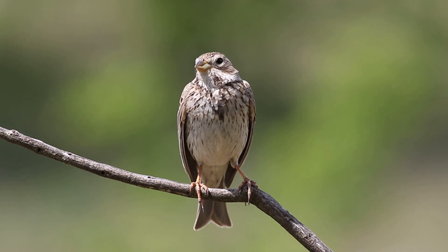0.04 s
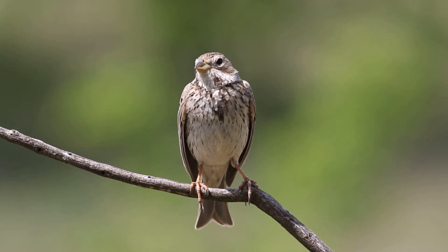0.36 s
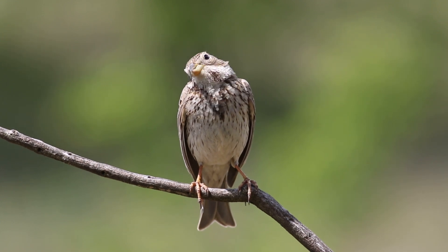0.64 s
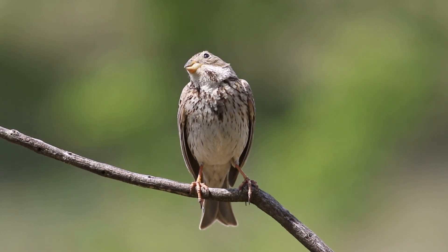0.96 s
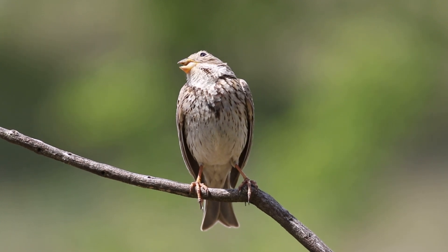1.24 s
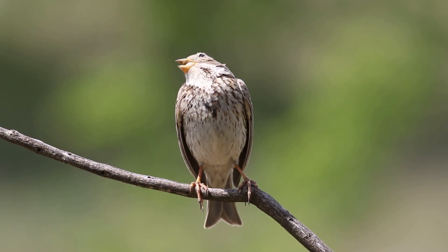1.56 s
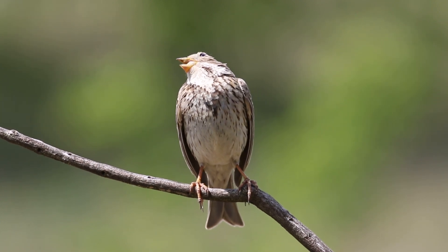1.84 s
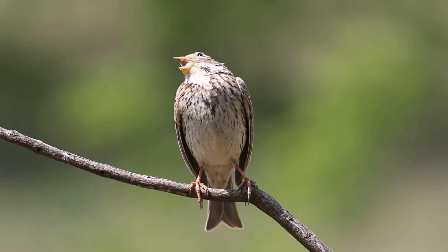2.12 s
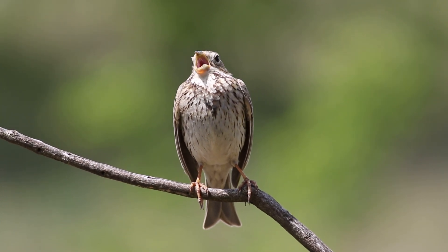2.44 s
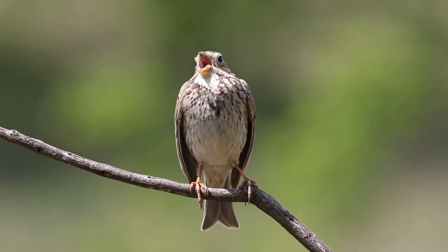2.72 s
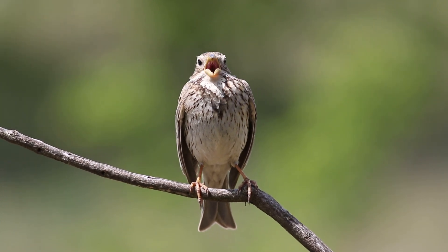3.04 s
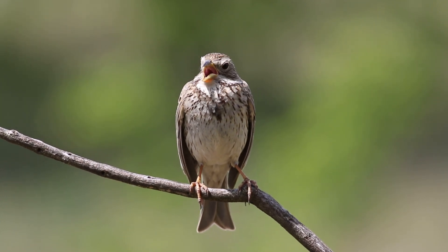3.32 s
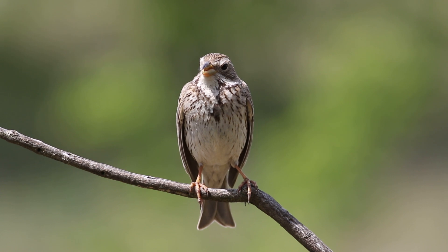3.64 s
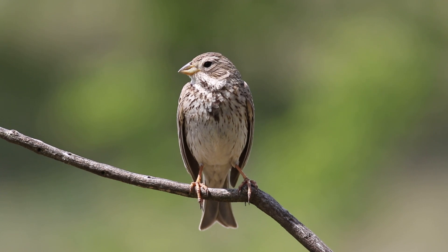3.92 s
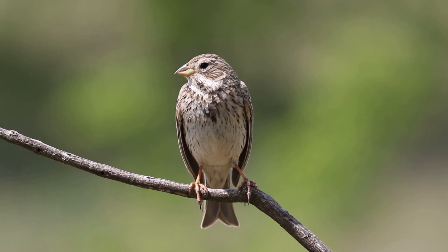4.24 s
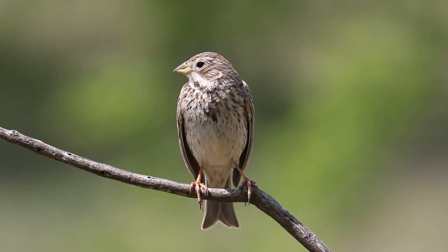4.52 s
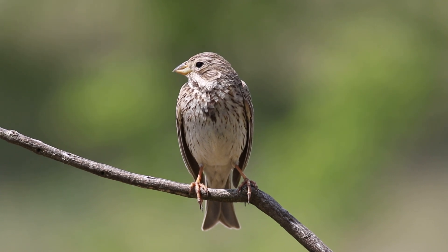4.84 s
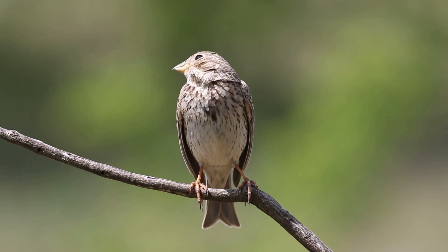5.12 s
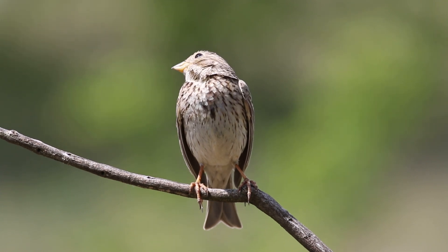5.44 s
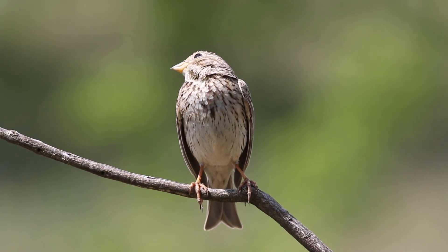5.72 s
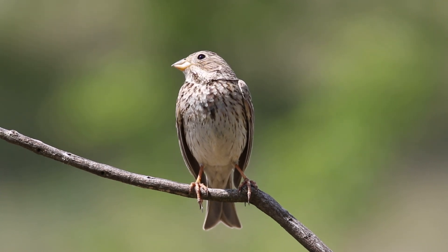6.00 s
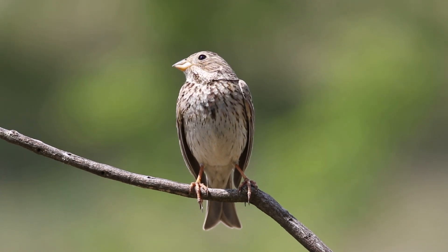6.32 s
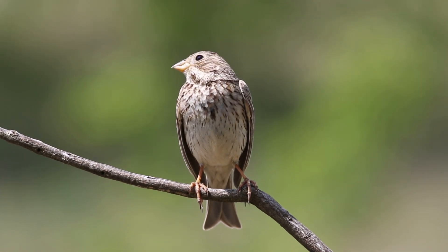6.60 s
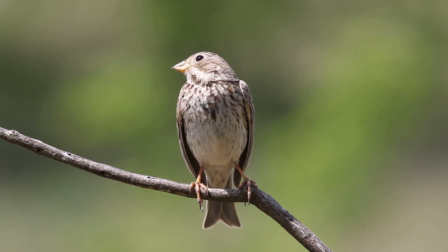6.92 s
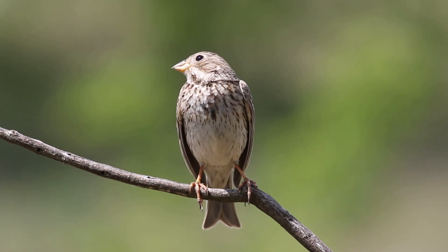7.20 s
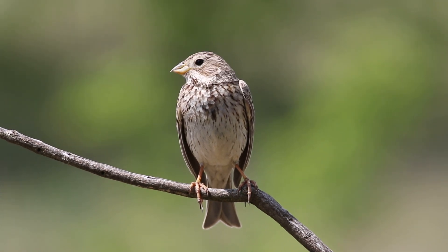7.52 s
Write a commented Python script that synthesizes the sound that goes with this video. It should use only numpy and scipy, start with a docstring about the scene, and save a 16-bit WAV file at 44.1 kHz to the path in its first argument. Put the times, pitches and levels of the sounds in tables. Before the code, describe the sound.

A small bird sings close by, sharp ticks speeding into a bright jangle and falling chips, with faint distant whistles.

```python
"""Open scrub. A bunting sings: sharp ticks speed up into a jangle, then falling chips and two soft
afternotes. Each note is a whistle some milliseconds long; the two sides of the syrinx often sound
together, and the foliage scatters them. A far bird whistles low phrases over a faint wash of air,
with a few distant calls, dry ticks and leaf rustles."""
import sys
import numpy as np
from scipy import signal
from scipy.fft import rfft, irfft
from scipy.io import wavfile
from scipy.ndimage import uniform_filter1d

SR = 44100
rng = np.random.default_rng(int(sys.argv[2]) if len(sys.argv) > 2 else 0)


def to_wav(s):
    """Save 16-bit WAV."""
    ch = np.atleast_2d(s).T  # columns
    pcm = np.round(np.clip(ch, -1, 1) * 32767)  # PCM
    wavfile.write(sys.argv[1], SR, pcm.astype(np.int16))


N = 337806
TIME = np.arange(N) / SR


def from_db(db):
    """dB to gain."""
    return 10 ** (np.asarray(db) / 20)


def unit_rms(x):
    """Scale to unit power."""
    return x / np.sqrt(np.mean(x ** 2) + 1e-20)


def in_time(rows):
    """Interpolate each column after t/s to every sample."""
    times_s, *columns = np.transpose(rows)
    return [np.interp(TIME, times_s, column) for column in columns]


def coloured(x, spectrum):
    """Filter by rows of f/Hz, gain/dB."""
    hz, db = np.transpose(spectrum)
    bins_hz = np.maximum(np.fft.rfftfreq(N, 1 / SR), 1)
    return irfft(rfft(x) * from_db(np.interp(np.log(bins_hz), np.log(hz), db)), N)


def noise(spectrum):
    """Coloured noise, unit RMS."""
    return unit_rms(coloured(rng.standard_normal(N), spectrum))


def drift(corner_hz):
    """Low-passed random wander, unit RMS."""
    bins_hz = np.fft.rfftfreq(N, 1 / SR)
    return unit_rms(irfft(rfft(rng.standard_normal(N)) / (1 + (bins_hz / corner_hz) ** 2), N))


def air(wash_gain_db, hiss_gain_db, sway_db, stir_db):
    """Steady distant wash under a thin, slightly stirring hiss."""
    # air levels: t/s, wash/dB, hiss/dB
    levels = [(0.0, -58.5, -64.5), (4.29, -57.5, -64), (4.95, -57, -61), (7.66, -56.5, -61)]
    # wash spectrum: f/Hz, density/dB
    wash_colour = [(15, -56.5), (25, -33), (54, -8.5), (189, -1.5), (326, -4.5), (520, -1), (593, -4),
                   (676, -2.5), (1930, -8.5), (2200, -13.5), (2860, -32.5), (4840, -120)]
    # hiss spectrum: f/Hz, density/dB
    hiss_colour = [(1300, -19.5), (2000, -2), (3700, 0.5), (4600, -5), (7000, -6.5), (10000, -9),
                   (14200, -15), (14700, -52.5)]
    wash_db, hiss_db = in_time(levels)
    wash = from_db(wash_db + wash_gain_db + sway_db * drift(5)) * noise(wash_colour)
    hiss = from_db(hiss_db + hiss_gain_db + stir_db * drift(25)) * noise(hiss_colour)
    return wash + hiss


def leaves(decay_s, crackle_db):
    """Dry snaps die at once; rustles are grainy swells."""
    # ticks in the undergrowth: t/s, level/dB
    dry_ticks = [(0.6577, -45), (4.396, -46.5), (5.066, -45.5), (5.0941, -37.5), (5.2553, -45),
                 (6.6485, -44), (6.8267, -45.5), (6.868, -41)]
    # leaf rustles: t/s, half width/s, level/dB
    rustles = [(1.168, 0.02, -50.5), (3.812, 0.028, -54.5), (4.55, 0.013, -53.5), (4.91, .04, -57.5),
               (5.87, 0.034, -52), (7.25, 0.022, -56.5)]
    # leaf spectrum: f/Hz, density/dB
    leaf_colour = [(1500, -6.5), (3200, -2), (8000, -5.5), (14000, -13), (16000, -43.5)]
    snaps = sum(from_db(db) * (TIME >= s) * np.exp(-np.abs(TIME - s) / decay_s) for s, db in dry_ticks)
    swells = sum(from_db(db) / (1 + ((TIME - s) / half_s) ** 2) for s, half_s, db in rustles)
    grain = unit_rms(from_db(crackle_db * drift(123)))
    return (snaps + swells * grain) * noise(leaf_colour)


def foliage_scatter(x):
    """Countless small echoes off branch, ground and bushes, thinning with delay."""
    # echo decay: delay/s, level per ms/dB
    decay = [(.001, -11.5), (.006, -18.5), (.013, -22), (0.02, -27.5), (0.038, -36.5), (.07, -47),
             (.12, -63.5), (.3, -82.5)]
    # scattered share, less in the forward-beamed treble: f/Hz, gain/dB
    colour = [(1600, -7), (5300, 3), (7000, -2.5), (11000, -3)]
    delay_s, db = np.transpose(decay)
    lag_s = TIME[TIME < delay_s[-1]]
    envelope = from_db(np.interp(lag_s, delay_s, db)) * (lag_s > delay_s[0])
    echoes = rng.standard_normal(len(lag_s)) * envelope / np.sqrt(SR / 1000)
    return signal.fftconvolve(coloured(x, colour), echoes)[:N]


def faint_calls(jitter):
    """Short tones, blurred by distance."""
    # hoots and peeps: t/s, half length/s, f/Hz, level/dB
    calls = [(0.312, 0.026, 1700, -54), (2.07, 0.022, 1500, -53), (2.336, 0.043, 769, -60),
             (2.856, 0.051, 620, -59), (3.635, 0.092, 539, -55.5), (6.298, 0.0086, 1260, -43.5),
             (6.38, .05, 1944, -58.5), (7.367, 0.0073, 1884, -48.5)]
    wavering_s = np.cumsum(1 + jitter * drift(60.4)) / SR
    out = np.zeros(N)
    for s, half_s, hz, db in calls:
        envelope = np.exp(-np.minimum(((TIME - s) / half_s) ** 2, 20))
        out += from_db(db) * envelope * np.sin(2 * np.pi * hz * wavering_s)
    return out


def far_yelps(foot=.7, bend_s=.023, swell_s=.019, fall_stretch=1.2):
    """Pitch arches up and back down; yields samples, f/Hz, level/dB."""
    # arch tops: t/s, f/Hz, level/dB
    yelps = [(3.207, 1868, -41), (5.155, 1980, -34), (6.654, 1880, -37.5), (6.824, 1890, -37)]
    for s, top_hz, db in yelps:
        at = np.flatnonzero(np.abs(TIME - s) < 3 * swell_s)
        t = (TIME[at] - s) / np.where(TIME[at] > s, fall_stretch, 1)
        arch = foot + (1 - foot) * np.exp(-(t / bend_s) ** 2)
        yield at, top_hz * arch, db - 20 / np.log(10) * (t / swell_s) ** 2


def far_whistles(climb_share=.12, drop_share=.21, drop_s=.0285, fade_db=9.5):
    """Long notes climb and swell, then drop away; yields samples, f/Hz, level/dB."""
    # whistles: t/s, length/s, top f/Hz, level/dB, swell/dB
    whistles = [(3.243, .165, 1685, -43.5, 10), (5.199, 0.16, 1602, -38, 13), (6.029, .11, 1456, -44.5, 4),
                (6.685, .125, 1670, -42, 12.5)]
    for s, length_s, top_hz, db, swell_db in whistles:
        at = np.flatnonzero((TIME > s) & (TIME < s + length_s))
        t, climb_s = TIME[at] - s, length_s - drop_s
        to_climb = np.maximum(1 - t / climb_s, 0)
        drop = np.maximum((t - climb_s) / drop_s, 0) ** 2
        hz = top_hz * (1 - climb_share * to_climb ** 2 - drop_share * drop)
        yield at, hz, db - swell_db * to_climb - fade_db * drop


def far_bird(jitter, octave_db):
    """Soft, nearly pure yelps and whistles; one whistle is rolled."""
    roll_from_s, roll_to_s, roll_hz = 6.032, 6.123, 55
    out, waver = np.zeros(N), 1 + jitter * drift(92.4)
    for at, hz, db in [*far_yelps(), *far_whistles()]:
        phase = 2 * np.pi * np.cumsum(hz * waver[at]) / SR
        out[at] += from_db(db) * (np.sin(phase) + from_db(octave_db) * np.sin(2 * phase))
    rolling = (TIME > roll_from_s) & (TIME < roll_to_s)
    return out * (1 - rolling * np.cos(2 * np.pi * roll_hz * (TIME - roll_from_s)))


def note(start_s, length_s, hz, db, bend=1):
    """Note row: t/s, length/s, (start, middle, end) f/Hz, level/dB; bend multiplies the pitch."""
    return start_s, length_s, np.multiply(hz, bend), db


def slur_notes():
    """Soft falling slurs over a lower voice open and close the song."""
    # slurs: t/s, f/Hz, level/dB, lower voice/relative dB
    slurs = [(1.3442, 5550, -29, -1), (1.8175, 5740, -19, -11), (3.5463, 5620, -27, -7),
             (3.5975, 5240, -28, -33), (4.1, 5650, -37.5, -13), (4.152, 5290, -36.5, -32.5)]
    for s, hz, db, lower_db in slurs:
        yield note(s, .0135, hz, db, bend=(1.11, .97, 1))
        yield note(s, .0079, (4690, 4610, 4640), db + lower_db)


def tick_notes(zip_s=.0048, lead_s=.0028):
    """A fast upsweep from each side of the syrinx, one just ahead, then a rising ping."""
    # upsweeps: t/s, f/Hz, level/dB, leading side/relative dB
    zips = [(1.6153, 6400, -20, -5), (1.984, 6670, -17, -10), (2.1164, 6700, -17.5, -27),
            (2.2296, 6800, -17.5, -4.5), (2.3026, 7120, -15, -5), (2.383, 6970, -12, -10)]
    # pings: t/s, length/s, f/Hz, level/dB
    pings = [(1.375, 0.015, 5030, -32), (1.622, 0.011, 5310, -21), (1.848, 0.01, 4950, -19.5),
             (1.9923, 0.013, 5264, -21), (2.1247, 0.016, 5740, -16.5), (2.238, 0.016, 5710, -15.5),
             (2.313, .016, 5730, -15), (2.3918, 0.017, 5555, -14), (3.103, .015, 5770, -15.5)]
    for s, hz, db, lead_db in zips:
        yield note(s - lead_s, zip_s, hz, db + lead_db, bend=(.66, .98, 1.16))
        yield note(s, zip_s, hz, db, bend=(.79, .99, 1.05))
    for s, length_s, hz, db in pings:
        yield note(s, length_s, hz, db, bend=(.83, .99, 1))


def clink_notes(gap_s=.0022):
    """Dive and rebound in a V, bridged by the lower voice."""
    # clinks: t/s, dive length/s, level/dB, lower voice/relative dB
    clinks = [(2.434, 0.0067, -13, -15), (2.468, 0.007, -10.5, -14.5), (2.5033, 0.008, -13, -20),
              (3.103, 0.0025, -24, 0)]
    for s, dive_s, db, lower_db in clinks:
        yield note(s, dive_s, (8200, 6480, 4950), db)
        yield note(s + dive_s + gap_s, .005, (3500, 6290, 8550), db + .5)
        yield note(s + dive_s / 2, .008, (5330, 4387, 3700), db + lower_db)


def jangle_notes(pitch_spread=.017, spread_db=1.6):
    """Scoops, trills and glassy hooks, the other side flicking down; repeats vary slightly."""
    # scoops between runs: t/s, level/dB
    scoops = [(2.767, -10.5), (2.8725, -12)]
    # runs of falling hooks: from/s, to/s, period/s, f/Hz, level/dB, flick/relative dB
    hook_runs = [(2.5353, 2.565, 0.011, 6850, -12.5, -8.5), (2.569, 2.616, 0.013, 6740, -12, -4.5),
                 (2.621, 2.625, .006, 6720, -18, -5), (2.6556, 2.729, 0.011, 7010, -13.5, -11),
                 (2.805, 2.821, 0.011, 6850, -12.5, -5), (2.974, 3.004, .012, 6630, -15, -8),
                 (3.0328, 3.037, 0.013, 6940, -10, -2.5), (3.0542, 3.069, 0.01, 6770, -11.5, -8.5)]
    # trills: from/s, to/s, period/s, note length/s, start f/Hz, middle f/Hz, end f/Hz, level/dB
    trills = [(2.6655, 2.73, 0.013, 0.007, 4750, 4480, 4836, -20),
              (2.8975, 2.934, 0.0053, 0.0086, 4300, 5270, 6800, -25),
              (2.9113, 2.937, .0056, .0043, 6700, 6950, 7100, -14)]

    def uneven(s, length_s, hz, db, bend=1):
        """Note with pitches and level slightly off."""
        detune = 1 + pitch_spread * rng.standard_normal(3)
        return note(s, length_s, detune * hz, db + spread_db * rng.standard_normal(), bend)

    for s, db in scoops:
        yield note(s, .015, (7400, 6900, 7440), db)
    for from_s, to_s, period_s, hz, db, flick_db in hook_runs:
        for s in np.arange(from_s, to_s, period_s):
            yield uneven(s, .86 * period_s, hz, db, bend=(1.105, 1.005, 1.01))
            yield uneven(s + .46 * period_s, .005, hz, db + flick_db, bend=(1, .9, .785))
    for from_s, to_s, period_s, length_s, *pitches_hz, db in trills:
        for s in np.arange(from_s, to_s, period_s):
            yield uneven(s, length_s, pitches_hz, db)


def chip_notes(lag_s=.0011):
    """Falling chips; the lower voice starts later and drops faster."""
    # closing run, slowing and fading: t/s, level/dB, lower voice/relative dB
    chips = [(3.14, -13, -4), (3.18, -12.5, -4.5), (3.2226, -12, -7), (3.2665, -12.5, -6),
             (3.3126, -12.5, -12), (3.359, -13.5, -8), (3.407, -15, -6.5), (3.4596, -19.5, -7)]
    for s, db, lower_db in chips:
        yield note(s, .0138, (7800, 6950, 5670), db)
        yield note(s + lag_s, .01, (8120, 5690, 5040), db + lower_db)


def syrinx(notes, swell_power, jitter, flutter_db):
    """Each note swells and fades as its pitch bends; complex output."""
    out = np.zeros(N, complex)
    waver, flutter = 1 + jitter * drift(600), from_db(flutter_db * drift(450))
    for s, length_s, pitches_hz, db in notes:
        at = np.arange(int(s * SR), int((s + length_s) * SR))
        progress = np.linspace(0, 1, len(at))
        hz = np.polyval(np.polyfit([0, .5, 1], pitches_hz, 2), progress) * waver[at]
        pressure = np.abs(np.sin(np.pi * progress)) ** swell_power * flutter[at]
        out[at] += from_db(db) * pressure * np.exp(2j * np.pi * np.cumsum(hz) / SR)
    return out


def buzzes(shake_hz, jitter, depth, swing_hz):
    """A second, slower vibration shakes pitch and airflow; complex output."""
    # lower-voice buzzes: t/s, length/s, f/Hz, level/dB
    buzz_notes = [(2.632, .02, 5630, -17), (2.74, 0.0098, 5620, -13.5), (2.753, 0.012, 5370, -20),
                  (2.787, 0.012, 6190, -13), (2.791, .034, 5400, -28), (2.832, 0.0094, 5050, -18.5),
                  (2.849, 0.016, 5500, -19), (2.95, 0.015, 5850, -17), (2.962, 0.013, 5400, -20.5),
                  (2.973, 0.038, 5480, -24.5), (3.016, 0.014, 5400, -21), (3.083, 0.012, 5650, -14.5)]
    out = np.zeros(N, complex)
    shake = 2 * np.pi * np.cumsum(shake_hz * (1 + jitter * drift(200))) / SR
    for s, length_s, hz, db in buzz_notes:
        at = np.arange(int(s * SR), int((s + length_s) * SR))
        pressure = np.sin(np.linspace(0, np.pi, len(at))) * (1 + depth * np.cos(shake[at]))
        phase = 2 * np.pi * np.cumsum(hz + swing_hz * np.sin(shake[at])) / SR
        out[at] += from_db(db) * pressure * np.exp(1j * phase)
    return out


def throat(x, direct_db, band_hz):
    """Broad pass band; resonances ring briefly as a note sweeps through."""
    # windpipe and beak resonances: f/Hz, width/Hz, gain/dB
    resonances = [(4680, 200, -11.5), (5900, 940, -12.5), (6910, 450, -7.5)]
    out = from_db(direct_db) * x
    for hz, width_hz, db in resonances:
        out += from_db(db) * signal.lfilter(*signal.iirpeak(hz, hz / width_hz, fs=SR), x)
    return signal.sosfilt(signal.butter(2, band_hz, "band", fs=SR, output="sos"), out)


def bunting(voice_db, overtone_db, difference_db, coupling, rasp_db):
    """Slightly nonlinear membranes add raspy octaves, and combination tones when both sides sing."""
    # beak radiation: f/Hz, gain/dB
    radiation = [(7500, -9), (9200, -7), (11000, 4.5), (12400, -2.5), (13700, -10.5), (14500, -12.5),
                 (16000, -20.5)]
    # beak opening, wider lets more overtone out: t/s, gain/dB
    gape = [(1.3, -4), (2.1, -4), (2.38, -5.5), (2.44, -0.5), (2.72, 0), (3.1, -1.5), (3.3, 5), (3.46, 1.5),
            (3.55, -5.5)]
    notes = [*slur_notes(), *tick_notes(), *clink_notes(), *jangle_notes(), *chip_notes()]
    voice = syrinx(notes, swell_power=.56, jitter=.013, flutter_db=.9)
    voice += buzzes(shake_hz=636, jitter=.31, depth=.49, swing_hz=300)
    envelope = np.abs(voice) + 1e-6
    smoothed = np.abs(uniform_filter1d(envelope, size=60)) + 1e-6
    voice *= (smoothed / envelope) ** coupling   # flattening the two sides' beats throws sidebands
    rasp = unit_rms(from_db(rasp_db * drift(1202)))
    octave = coloured(rasp * (voice ** 2).real / (np.abs(voice) + 1e-9), radiation)
    octave *= from_db(overtone_db + in_time(gape)[0])
    difference = signal.sosfilt(signal.butter(2, [2000, 4000], "band", fs=SR, output="sos"), envelope)
    whistle = throat(voice.real, direct_db=-2, band_hz=[4320, 10200])
    return from_db(voice_db) * whistle + octave + from_db(difference_db) * difference


def scene():
    """Mono mix; the far birds carry more scatter than the near one."""
    near = bunting(voice_db=.25, overtone_db=-15.5, difference_db=-27.5, coupling=.48, rasp_db=4)
    far = far_bird(jitter=.012, octave_db=-26) + faint_calls(jitter=.023)
    echoes = foliage_scatter(from_db(-.74) * near + from_db(3) * far)
    background = leaves(decay_s=.002, crackle_db=6)
    background += air(wash_gain_db=1.5, hiss_gain_db=4.5, sway_db=.6, stir_db=1.2)
    return (background + echoes + from_db(-1) * far + near)[None]


def record(dry):
    """Steep treble cut."""
    stop_hz = 15900
    return signal.sosfilt(signal.cheby2(20, 70, stop_hz, fs=SR, output="sos"), dry)


dry = scene()
out = record(dry)
to_wav(out)
```